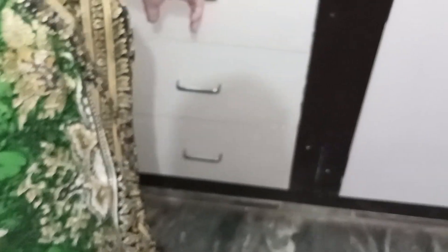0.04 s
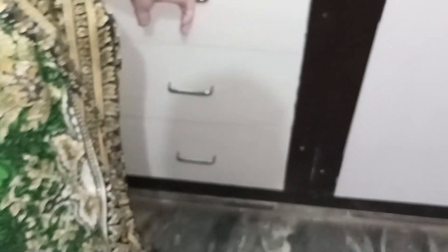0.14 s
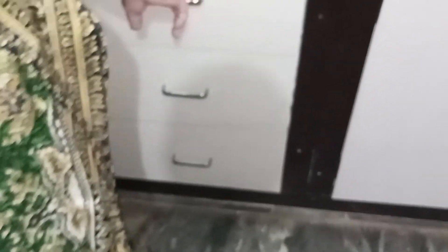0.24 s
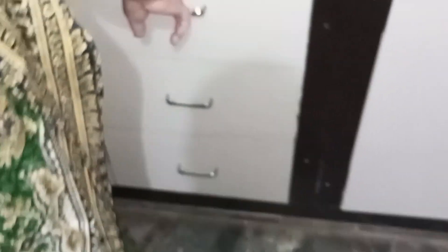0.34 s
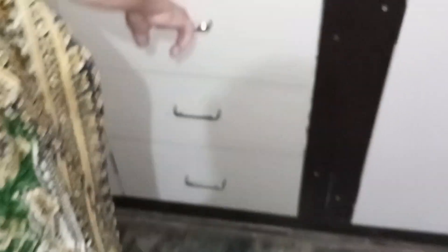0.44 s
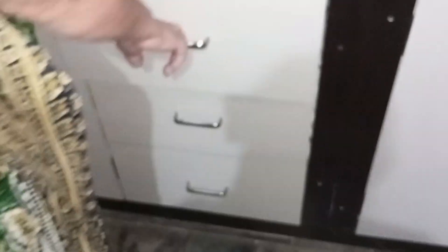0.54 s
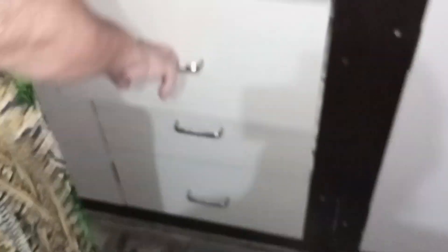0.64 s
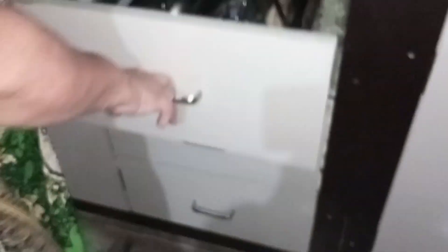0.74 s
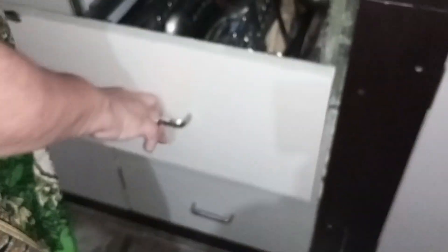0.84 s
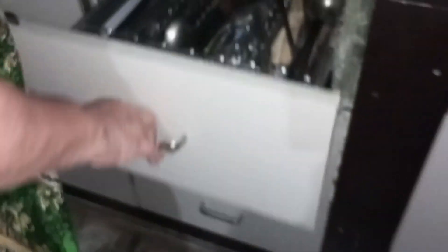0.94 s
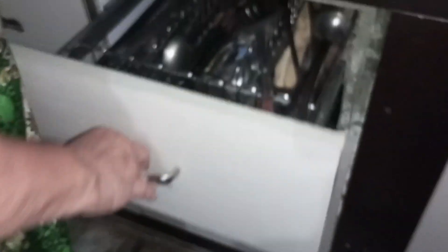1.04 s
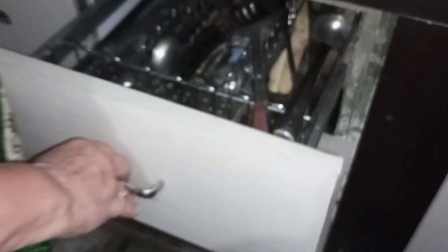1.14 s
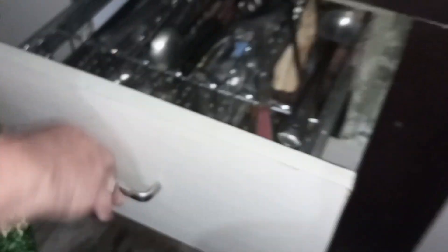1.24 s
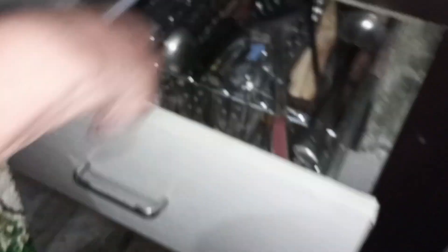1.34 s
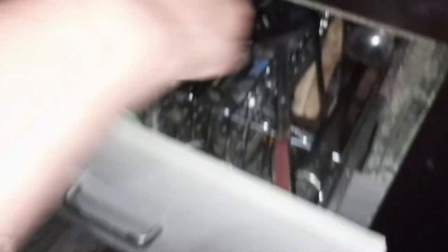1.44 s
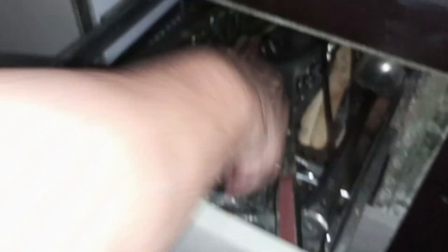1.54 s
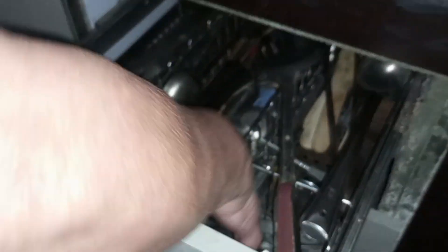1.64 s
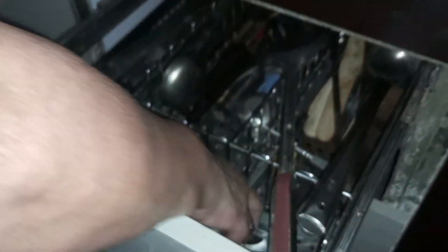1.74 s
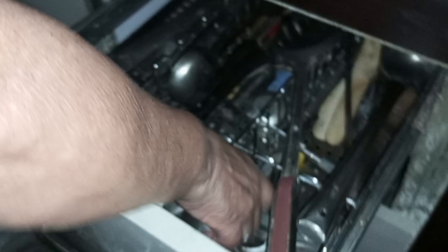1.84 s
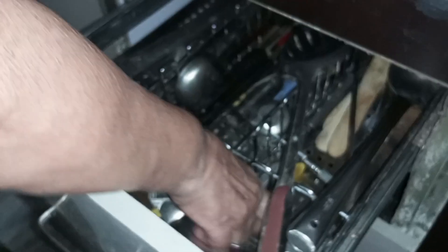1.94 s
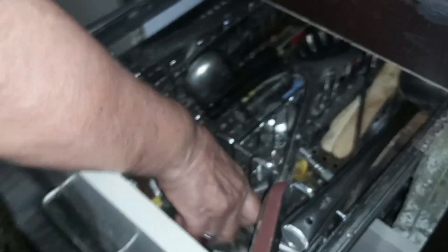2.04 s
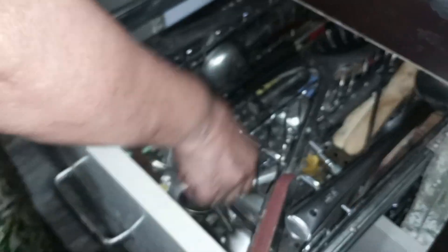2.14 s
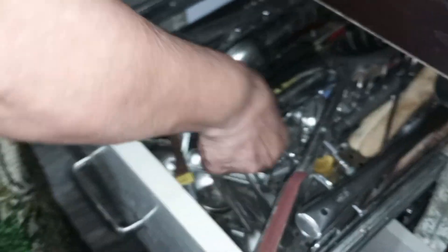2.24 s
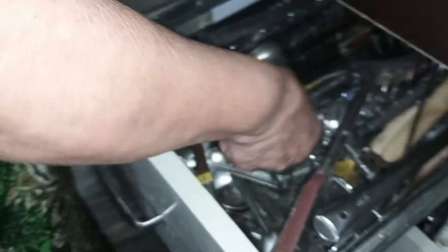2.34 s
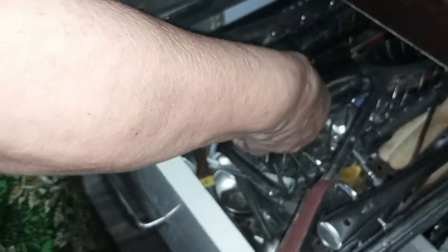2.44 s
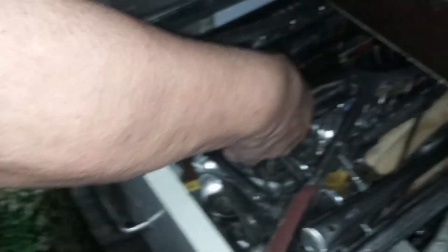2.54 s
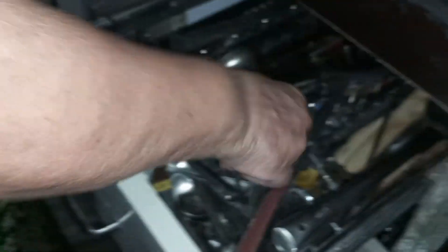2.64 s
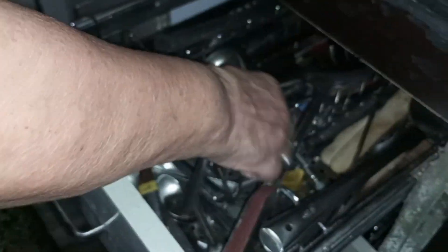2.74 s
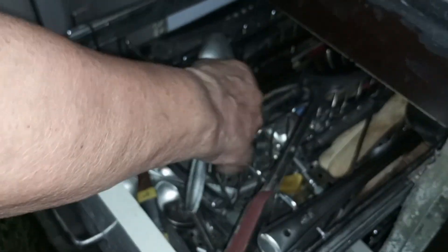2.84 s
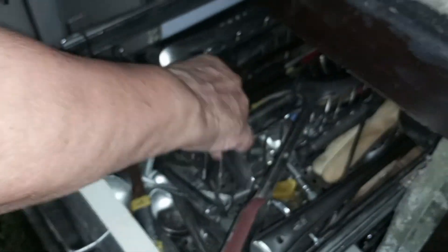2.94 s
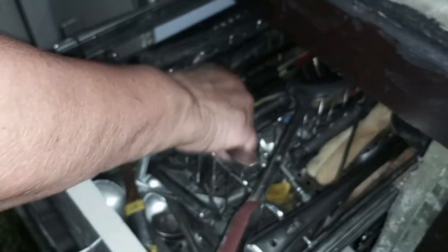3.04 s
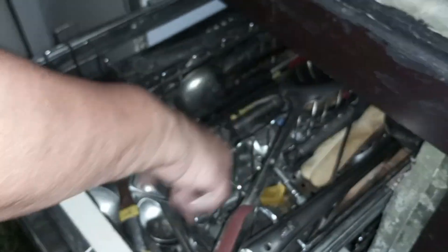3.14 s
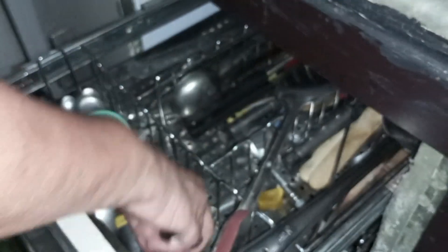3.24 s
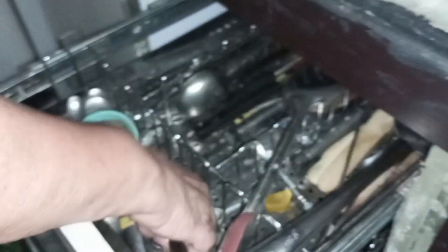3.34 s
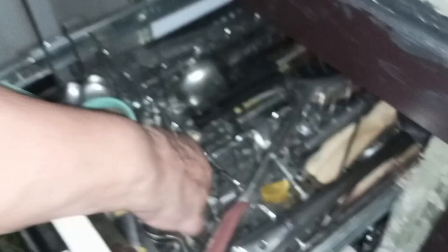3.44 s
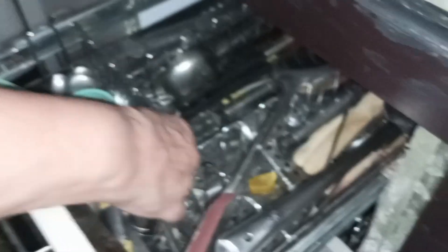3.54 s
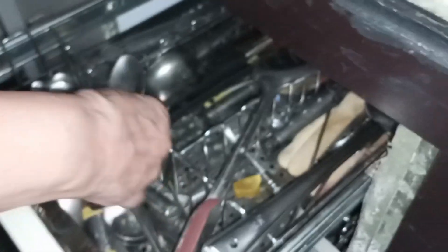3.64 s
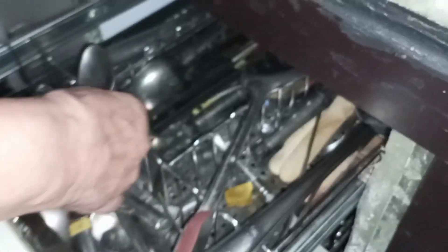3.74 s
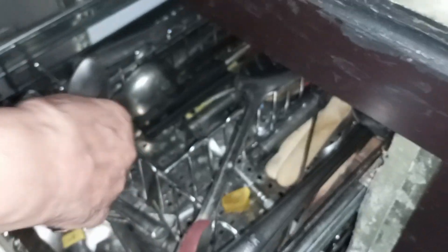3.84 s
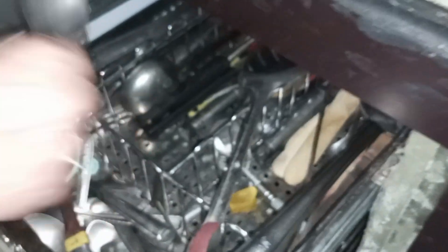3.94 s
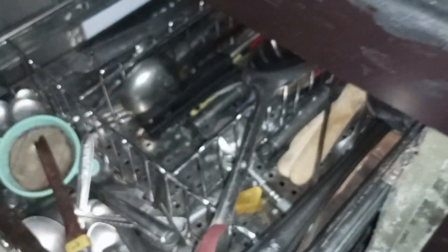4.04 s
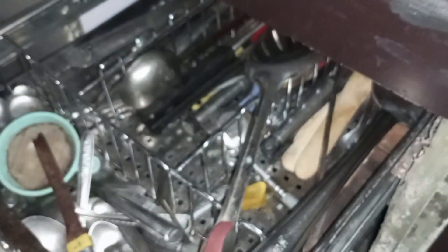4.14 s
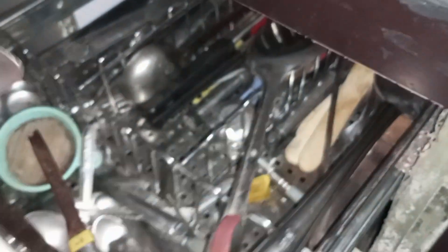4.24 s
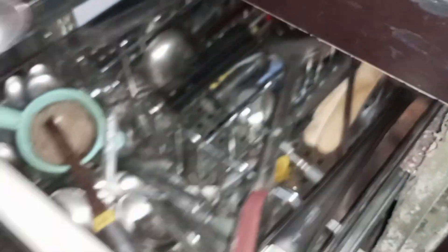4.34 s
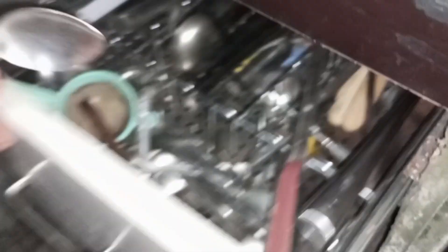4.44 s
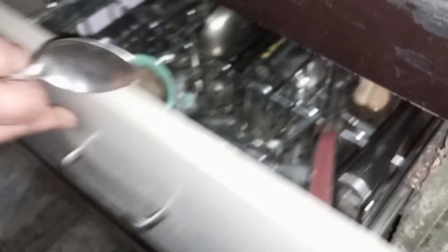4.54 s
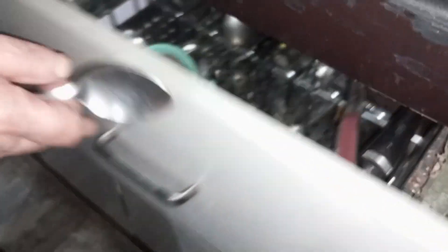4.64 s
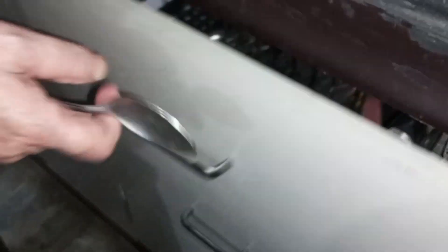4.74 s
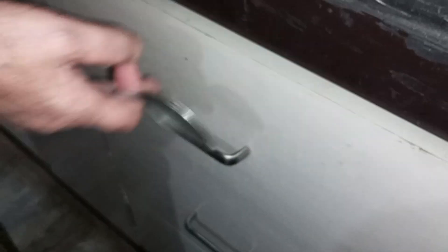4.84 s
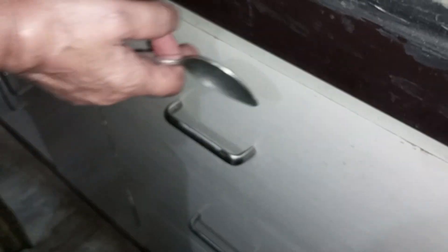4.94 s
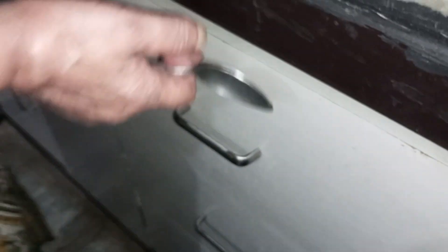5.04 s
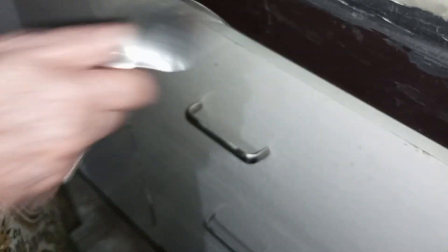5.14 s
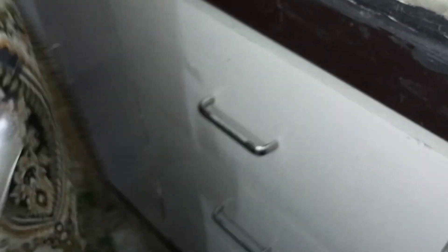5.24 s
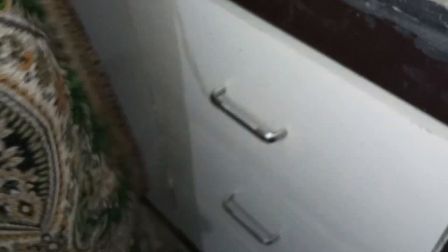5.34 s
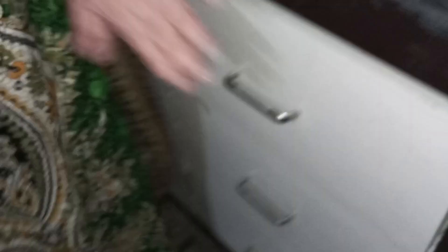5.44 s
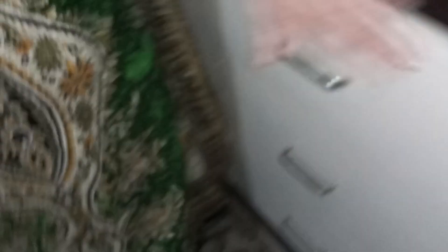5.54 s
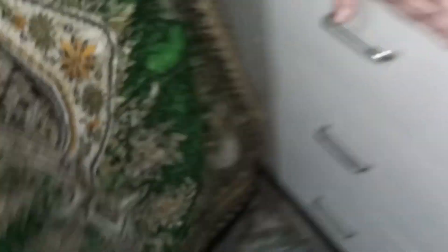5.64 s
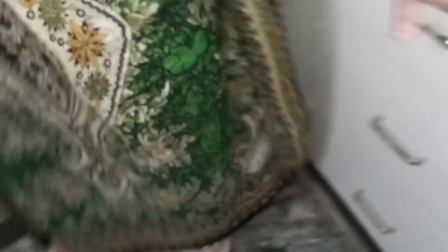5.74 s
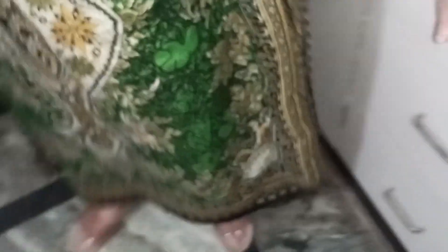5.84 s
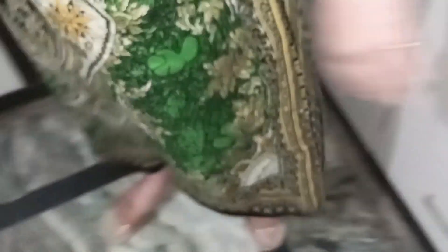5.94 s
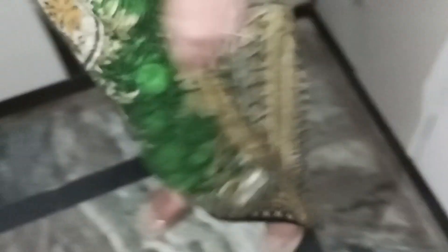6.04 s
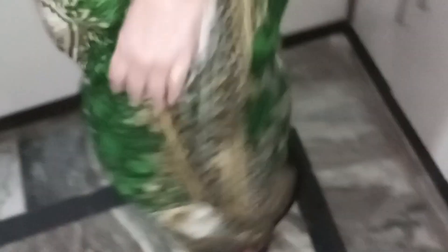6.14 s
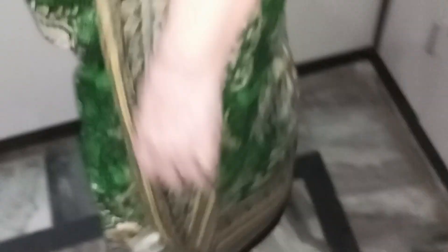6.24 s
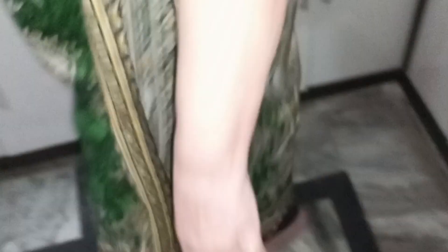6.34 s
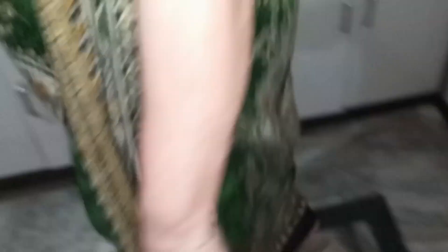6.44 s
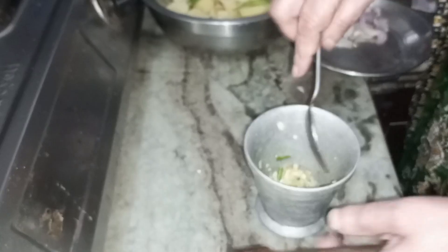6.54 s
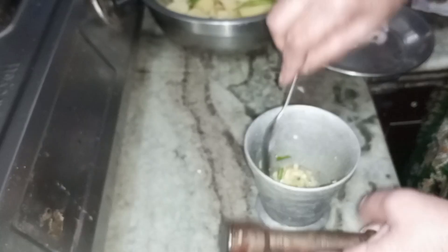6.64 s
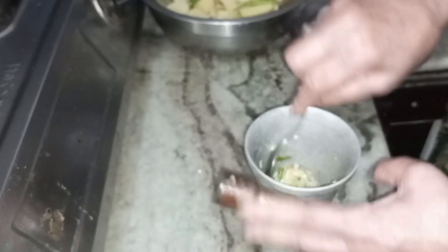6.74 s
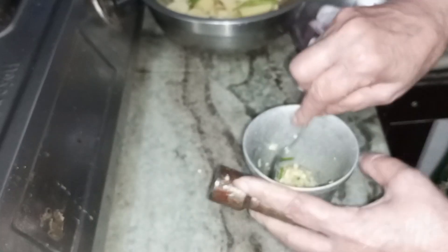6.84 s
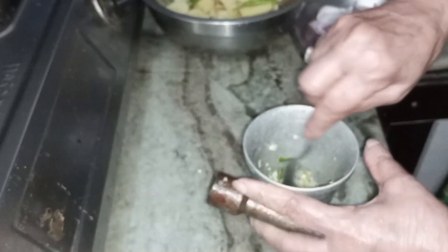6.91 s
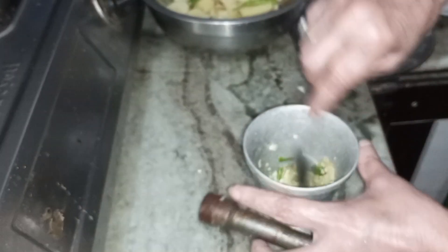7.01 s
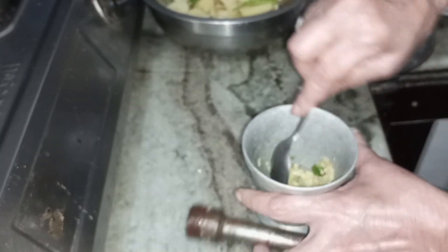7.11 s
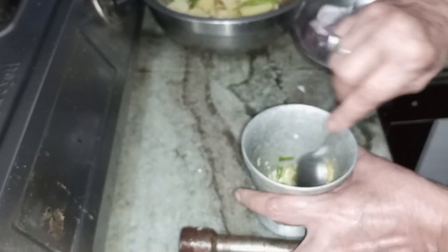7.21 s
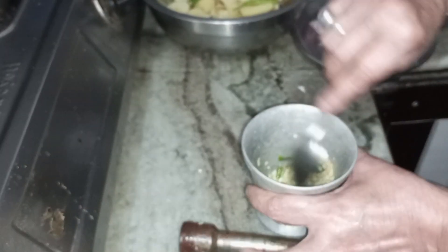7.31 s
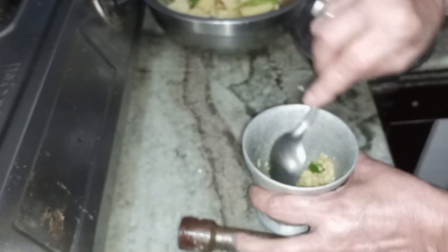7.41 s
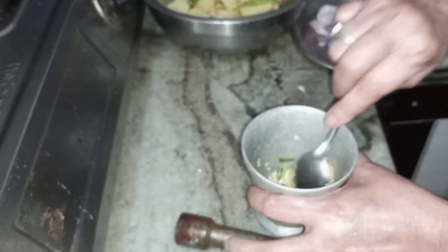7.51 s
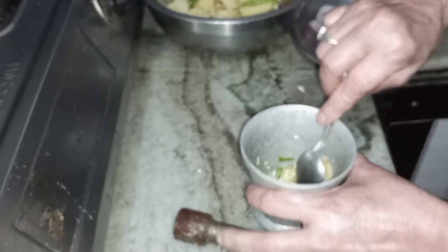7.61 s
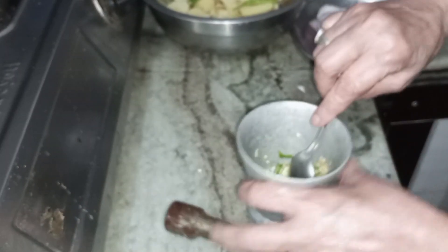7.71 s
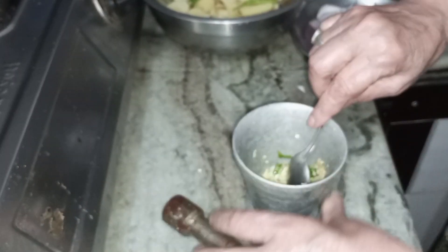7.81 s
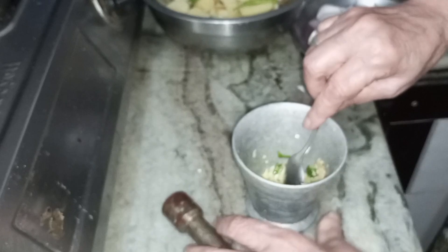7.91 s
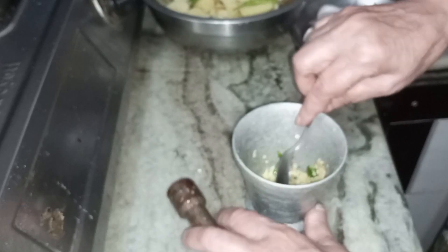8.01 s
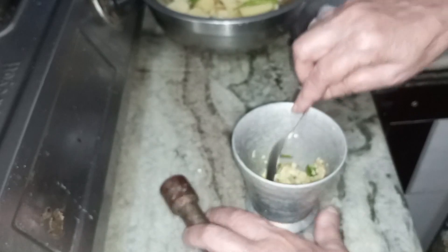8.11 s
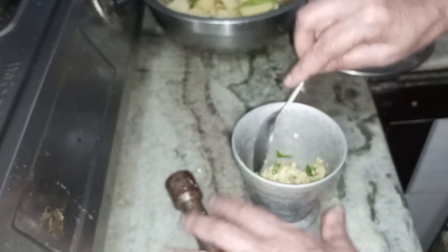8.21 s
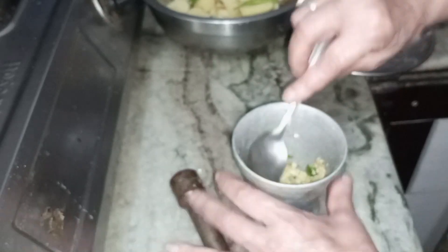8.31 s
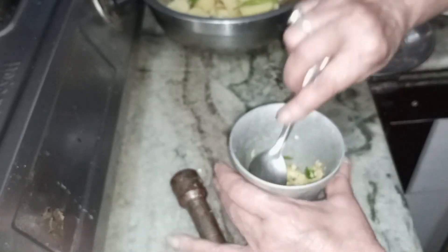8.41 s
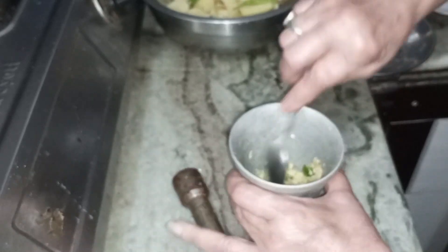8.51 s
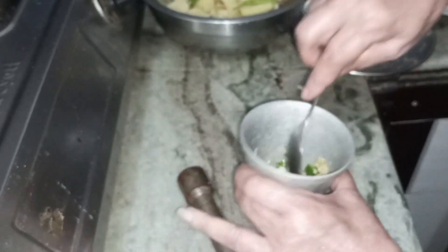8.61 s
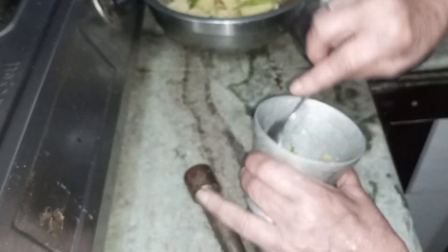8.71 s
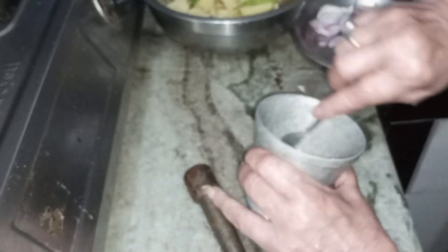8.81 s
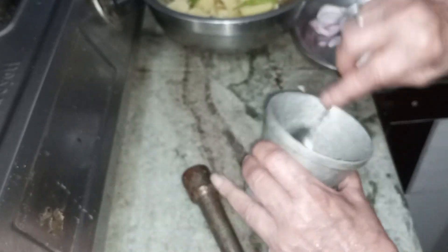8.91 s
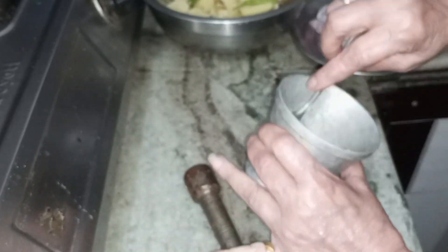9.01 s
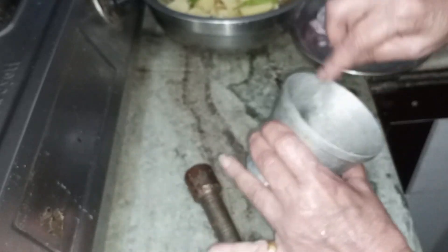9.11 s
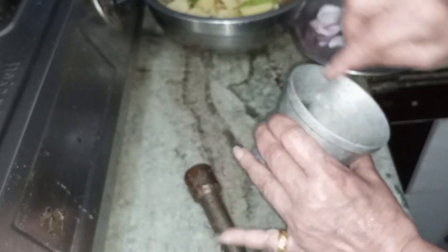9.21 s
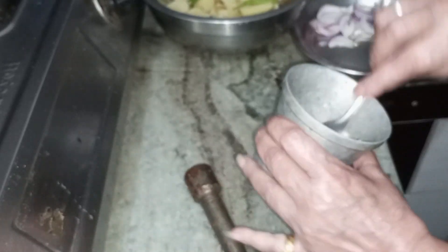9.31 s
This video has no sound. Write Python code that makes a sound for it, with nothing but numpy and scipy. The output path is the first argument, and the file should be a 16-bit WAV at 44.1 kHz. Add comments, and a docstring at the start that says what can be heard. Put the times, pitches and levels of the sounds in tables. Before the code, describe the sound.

Someone rummages through a cutlery drawer and slams it, then clinks and scrapes a spoon in a steel mortar, with faint crickets outside.

```python
"""A kitchen at night, crickets outside. A drawer rolls open, a hand rummages in steel cutlery, and the
drawer slams shut. Then a spoon taps and scrapes a steel mortar on a stone counter, and a steel pestle
is knocked about. Impacts excite free vibration, a sum of damped modes; rolling and rubbing are streams
of tiny contacts that drive resonances in forced vibration. The room adds a short reverberation."""
import sys
import numpy as np
from scipy import signal
from scipy.io import wavfile

SR = 44100
rng = np.random.default_rng(int(sys.argv[2]) if len(sys.argv) > 2 else 0)


def store_wav(level_fs):
    """Save 16-bit WAV to argv[1]."""
    pcm = np.round(np.clip(np.atleast_2d(level_fs), -1, 1) * 32767)
    wavfile.write(sys.argv[1], SR, pcm.T.astype(np.int16))


N = 412996


def gain_of(db):
    """Decibels to amplitude ratio."""
    return 10 ** (np.asarray(db) / 20)


def unit_rms(x):
    """Normalisation to an rms of 1."""
    return x / np.sqrt(np.mean(x ** 2) + 1e-20)


def value_at(points, hz):
    """Interpolation of (Hz, value) points over log frequency."""
    f, value = np.transpose(points)
    return np.interp(np.log(hz + 1), np.log(f + 1), value)


def add(mix, s, sound):
    """Superposition: a sound joins the mix at s seconds."""
    part = mix[round(s * SR):][:len(sound)]
    part += sound[:len(part)]


def coloured(x, spectrum):
    """Minimum-phase filtering, of unit energy, to a spectrum of (Hz, dB) points."""
    db = value_at(spectrum, abs(np.fft.fftfreq(4096, 1 / SR)))
    log_gain = np.log(gain_of(np.maximum(db, -90)))
    taps = np.fft.ifft(np.exp(log_gain - 1j * signal.hilbert(log_gain).imag)).real[:2048]
    return signal.oaconvolve(x, taps / np.linalg.norm(taps))[:len(x)]


def flutter(db, step=500):
    """Random modulation: a gain that glides to a new value every step samples."""
    knots = rng.standard_normal(N // step + 2)
    return gain_of(db * np.interp(np.arange(N) / step, np.arange(len(knots)), knots))


def grit(per_s, spread_db, smooth):
    """Shot noise: tiny contacts of uneven size over a share of smooth noise."""
    size = gain_of(spread_db * np.minimum(rng.exponential(1, N), 5)) * rng.standard_normal(N)
    contacts = size * (rng.random(N) < per_s / SR)
    return unit_rms(unit_rms(contacts) + smooth * rng.standard_normal(N))


def ring(modes, rise=0.00026, free=1):
    """Free vibration: damped sines from (Hz, dB, t60 s) modes; free scales the decay times."""
    hz, db, t60 = np.transpose(modes)[:, :, None]
    t60 = np.clip(t60 * free, .005, 1)
    t = np.arange(round(t60.max() * SR)) / SR
    sines = gain_of(db - 60 * t / t60) * np.sin(2 * np.pi * hz * t)
    return sines.sum(0) * (1 - np.exp(-t / max(rise, 1e-4)))


def resonator(x, hz, width):
    """Resonance: one driven mode of peak gain 1 and a bandwidth in Hz."""
    r = np.exp(-np.pi * width / SR)
    return 2 * signal.lfilter([1 - r], [1, -r * np.exp(2j * np.pi * hz / SR)], x).real


def driven(x, modes):
    """Forced vibration of a body with (Hz, bandwidth Hz, dB) modes."""
    return sum(gain_of(db) * resonator(x, hz, width) for hz, width, db in modes)


def burst(db, t60, rise):
    """Envelope of an impact: fast rise, exponential decay."""
    t = np.arange(SR // 5) / SR
    return gain_of(db - 60 * t / max(t60, .005)) * (1 - np.exp(-t / max(rise, 1e-4)))


def gestures(rows, rise_db=20):
    """Exponential swell and decay: an envelope per dB column of (peak s, rise s, hold s, t60 s, dB..)."""
    tracks = np.zeros((len(rows[0]) - 4, N))
    for s, rise, hold, t60, *levels in rows:
        rise, t60 = np.clip(rise, .001, .4), np.clip(t60, .02, 1)
        t = np.arange(-min(2 * rise, s), hold + t60, 1 / SR)
        shape = gain_of(np.minimum(rise_db * t / rise, 0) - 60 * np.maximum(t - hold, 0) / t60)
        for track, db in zip(tracks, levels):
            add(track, s + t[0], gain_of(db) * shape)
    return tracks


def night():
    """Stridulation: three near crickets pulse wavering tones over a far chorus and room hiss."""
    # Spectra of the hiss and the chorus. Each row: frequency in Hz, relative density in dB.
    air = [(15, -43), (25, -22), (111, -4.5), (197, -10), (226, -6), (313, -15.5), (378, -10.5), (457, -15),
           (4020, -27.5), (4730, -29), (5420, -27), (8100, -30), (9100, -21), (10000, -23.5), (11300, -17),
           (14000, -33), (16500, -47)]
    far_crickets = [(4200, -60), (4450, -22), (4600, -3), (4700, 0), (4810, -1), (4900, -20), (5200, -60)]
    strokes_per_s, waver = 50, .011  # waver is a share of the pitch
    chorus = unit_rms(coloured(rng.standard_normal(N), far_crickets) * flutter(2.5))
    phrases = flutter(4, step=SR // 10)
    for hz in (4610, 4700, 4790):
        pitch = hz * flutter(1, step=SR // 7) ** (8.7 * waver)
        rate = strokes_per_s * flutter(.3, step=SR // 5)
        strokes = np.maximum(np.sin(2 * np.pi * np.cumsum(rate) / SR) + .6, 0)
        chorus += gain_of(-4) * strokes * phrases * np.sin(2 * np.pi * np.cumsum(pitch) / SR)
    return gain_of(-61.5) * coloured(rng.standard_normal(N), air) + gain_of(-65.5) * unit_rms(chorus)


def drawer():
    """Rolling noise shakes the tray and its load; the front's impact and rebounds ring the panels."""
    # Runs on the rollers. Each row: start and length in seconds; relative rumble, rustle, hiss in dB.
    slides = [(0.515, .58, -54, -67.5, -73), (4.426, 0.36, -50.5, -71, -74)]
    # Cutlery and cloth shift. Each row: peak time, rise, t60 in seconds; the same three levels in dB.
    shifts = [(.214, 0.12, .33, -86, -63.5, -64), (.482, 0.11, 0.24, -73, -60.5, -63),
              (.875, 0.041, 0.13, -65, -66, -72), (1.225, 0.084, 0.36, -64, -61.5, -54),
              (1.433, 0.015, 0.24, -59, -68, -75), (1.64, 0.048, 0.33, -57.5, -67, -71),
              (3.542, 0.004, 0.72, -47, -52, -59), (3.714, 0.017, 0.21, -65.5, -42.5, -65),
              (4.363, 0.025, 0.053, -56, -47, -58), (4.492, 0.075, 0.036, -53, -56, -59),
              (4.636, 0.063, 0.44, -50, -48, -56), (4.853, .02, 0.2, -23, -66, -60),
              (4.89, 0.026, 0.23, -43, -36.5, -39.5), (5.1, 0.5, 0.36, -47, -52, -74),
              (5.294, 0.027, 0.31, -50, -58, -58), (5.638, 0.0037, 0.18, -27, -57, -48),
              (5.62, 0.064, 0.13, -66, -58, -56), (5.657, 0.011, 0.3, -32, -68, -63),
              (5.683, 0.026, 0.19, -39.5, -46, -51), (5.796, 0.077, 0.3, -66, -45.5, -39.5),
              (5.96, 0.13, 0.26, -57, -60, -77.5), (6.113, 0.062, 0.42, -61, -67.5, -63),
              (6.401, 0.068, 0.22, -64, -60, -52), (6.423, 0.02, 0.55, -52.5, -71, -78)]
    # Spectra of these noises. Each row: frequency in Hz, relative density in dB.
    rumble_spectrum = [(24, -66), (40, -39), (96, -1.5), (228, 1), (332, -0.5), (585, 2), (909, -4),
                       (1150, -4), (6000, -24.5), (7800, -38), (13200, -120)]
    rustle_spectrum = [(290, -30), (500, -19), (1050, -2.5), (1890, 1), (2940, -1), (6100, -6), (7710, -16),
                       (11000, -6.5), (15800, -37), (16500, -62)]
    hiss_spectrum = [(3000, -47), (7500, -12.5), (10000, 1), (13000, -13), (16000, -10.5)]
    # Handle and tray knock. Each row: time in seconds, relative level in dB, pitch in Hz, t60 in seconds.
    ticks = [(0.204, -40, 3080, 0.045), (0.429, -40.5, 1000, 0.099), (1.171, -34.5, 1705, 0.07),
             (1.208, -36.5, 1290, 0.078), (1.426, -38.5, 1664, 0.083), (1.62, -47, 2980, 0.04),
             (1.645, -37.5, 1616, 0.04), (3.706, -28, 2180, 0.034), (4.203, -41, 2880, 0.057),
             (4.357, -38, 1906, 0.031), (5.285, -53, 2670, 0.04), (6.373, -43.5, 3880, 0.041)]
    # Modes of loose cutlery and metal tray. Each row: frequency and bandwidth in Hz, relative gain in dB.
    loose_modes = [(1170, 26, -12), (1960, 21, 1.5), (2904, 46, 4.5), (5570, 60, 3), (6090, 79, -2),
                   (12100, 73, -27)]
    tray_modes = [(620, 29, -10), (1140, 18, 2), (1547, 32, 1), (2510, 56, 1), (2900, 50, -6),
                  (3200, 21, -9)]
    # The front meets the frame. Each row: time in seconds, then in relative dB the ring, its boost
    # below 90 Hz, its boost above 300 Hz and the clap.
    slams = [(4.835, -19, -14, 1, -21), (4.852, -19, -3, -3, -26), (4.867, -6, -8, -7, -12.5),
             (4.895, -21, -21, -1, -20.5), (5.634, -20.5, -9.5, 6.5, -21.5), (5.654, -14, 7.5, 7, -17.5),
             (5.668, -19, -9, 3.5, -24)]
    # Panel modes. Each row: frequency in Hz, relative level in dB, t60 in seconds.
    panel_modes = [(68, -8, 0.26), (112, -3, 0.29), (318, -12.5, 0.19), (232.5, -1, 0.076),
                   (373.6, -7.5, 0.17), (500, -29, 0.21), (589, -17, 0.12), (805, -11.5, 0.2),
                   (1020, -15, 0.092), (1600, -24, .15), (2450, -23, 0.084)]
    # Spectrum of the clap. Each row: frequency in Hz, relative density in dB.
    clap_spectrum = [(100, 10), (500, 8.5), (1200, -9.5), (2600, -5), (4000, -31), (16000, -50)]
    slide_rise_s, slide_t60 = 0.22, 0.29
    moves = [(s, slide_rise_s, length, slide_t60, *db) for s, length, *db in slides]
    moves += [(s, rise, 0, t60, *db) for s, rise, t60, *db in shifts]
    rumble_env, rustle_env, hiss_env = gestures(moves)
    rollers = rumble_env * flutter(2.1, step=SR // 40) * grit(2000, 3, 1.1)
    out = coloured(rollers, rumble_spectrum)
    for s, db, hz, t60 in ticks:
        add(rustle_env, s, burst(db - 19, t60, 0.00046))
        add(out, s, ring([(hz, db - 12, t60)]))
    rustle = rustle_env * grit(5000, 0.93, 0.62)
    out += gain_of(7) * coloured(rustle, rustle_spectrum)
    out += hiss_env * coloured(grit(5000, 1.7, 0.62), hiss_spectrum)
    early = slice(0, 7 * SR)
    out[early] += gain_of(10.5) * driven(rustle[early], loose_modes)
    out[early] += gain_of(12) * driven(rollers[early], tray_modes)
    claps = np.zeros(N)
    for s, db, low_db, high_db, clap_db in slams:
        modes = [(hz, db - 8 + mode_db + low_db * (hz < 90) + high_db * (hz > 300), t60)
                 for hz, mode_db, t60 in panel_modes]
        add(out, s, ring(modes, rise=0.0054))
        add(claps, s, burst(clap_db, 0.043, 0.00049))
    return out + coloured(claps * rng.standard_normal(N), clap_spectrum)


def cutlery():
    """Collision cascades: each clash starts a shower of contacts that excite inharmonic steel modes."""
    # Hand sweeps. Each row: start, rise, length, t60 in seconds; relative level in dB.
    sweeps = [(1.729, 0.0033, 0.16, 0.029, -30.5), (1.9, .02, 0.051, 0.22, -41.5),
              (2.022, 0.013, .001, 0.2, -29.5), (2.13, 0.028, 0.13, 0.52, -25.5),
              (2.214, 0.069, .14, 0.088, -27), (2.448, 0.07, 0.082, 0.27, -24.5),
              (3.42, 0.02, 0.012, 0.27, -42), (3.55, 0.012, 0.023, .35, -57)]
    # Each row: time in seconds, relative level in dB, main ring in Hz, t60 of the shower in seconds.
    clashes = [(1.7288, -14.5, 5730, 0.069), (1.7871, -15.5, 10700, 0.2), (1.823, -10, 11000, 0.021),
               (1.852, -17, 9680, 0.086), (1.8758, -11.5, 10900, 0.05), (1.921, -23.5, 10300, 0.14),
               (1.9418, -25, 13400, .06), (2.02, -25.5, 11100, 0.02), (2.034, -20.5, 11200, 0.041),
               (2.1009, -29, 11200, 0.062), (2.1144, -25, 9800, 0.025), (2.123, -15, 10450, 0.016),
               (2.1438, -17, 10800, 0.075), (2.1949, -4, 10900, 0.014), (2.244, -6, 10660, 0.021),
               (2.318, -7, 10670, 0.014), (2.3488, -10.5, 4570, 0.02), (2.413, -20, 9940, 0.1),
               (2.427, -17.5, 8900, .1), (2.45, -9.5, 10970, 0.059), (2.519, -9, 10460, 0.05),
               (2.6785, -3, 6100, 0.16), (2.6847, -12, 10100, .03), (3.383, -15, 10600, 0.27),
               (3.5374, -19, 10960, 0.13)]
    # Modes of single pieces. Each row: frequency in Hz, relative level in dB, t60 in seconds.
    knife = [(4576, 0, .075), (7250, -5, .06)]
    ladle = [(3553, -14, .13), (3985, -14, .11), (5163, -3, .08), (5750, -1, .09), (7133, -16.5, .26),
             (9932, -11, .2), (10260, 0, .08), (11710, -7, .08), (12540, -5, .09), (13100, -9, .15),
             (13740, -13, .12)]
    server = [(4576, -17, .18), (4786, -16, .18), (6239, -6, .2), (7757, -14, .15), (9440, -4, .09),
              (9652, -10, .2), (10490, -9, .25), (10880, -7, .26), (11970, -1, .09), (12500, -6, .08),
              (13790, -13, .12), (15140, -20, .17)]
    tongs = [(5383, -1.5, 0.13), (9055, -9, 0.18), (9270, -11, 0.23), (9448, -4, 0.15), (10870, -1, 0.27),
             (11890, -7, 0.16), (15080, -2, 0.21)]
    fork = [(2850, 6.5, 0.08), (2970, 6, .07), (2300, 4, .08), (5630, -1, 0.15), (5740, -1, .15)]
    basket = [(405, -4, 1), (418, -3.5, 1)]
    teaspoon = [(6200, 0, .25), (6520, -2, .2)]
    # Each row: a piece, then its clinks as time in seconds and level in dB.
    clinks = [(teaspoon, (.92, -67), (1.02, -62)), (knife, (2.3495, -17)), (ladle, (2.6787, -19)),
              (server, (3.384, -21), (3.398, -24)), (tongs, (3.538, -39.5)),
              (fork, (4.87, -44), (4.96, -48), (5.005, -51), (5.029, -45), (5.08, -50)),
              (basket, (4.87, -39), (5.29, -55), (5.661, -43.5))]
    # Pieces ringing under the hand. Each row: frequency and bandwidth in Hz, relative gain in dB.
    heap_modes = [(8800, 40, 0), (9600, 40, -2), (9780, 40, 0), (10500, 45, 0), (10930, 45, 3),
                  (11760, 50, 0)]
    # Spectrum of steel contacts. Each row: frequency in Hz, relative density in dB.
    steel_spectrum = [(59, -76), (100, -43), (225, -13), (338, -21), (577, -9), (642, -20), (699, -10),
                      (1170, -11), (1950, -5), (2360, -7.5), (6050, -6.5), (7810, -11.5), (10800, -2.5),
                      (15500, -16.5), (16500, -40)]
    force, out = gestures(sweeps)[0] * gain_of(-5.5), np.zeros(N)
    for (s, db, hz, t60), draws in zip(clashes, rng.random((len(clashes), 6, 3))):
        add(force, s, burst(db - 15, 0.007, 0.00023))  # first contact
        add(force, s, burst(db - 17.5, t60, 0.00081))  # shower
        add(out, s, ring([(hz, db - 14.5, .05), (hz * 1.012, db - 16.5, .04)], rise=0.00055))
        neighbour_modes = draws * [5000, 8, .06] + [8600, db - 24, .025]
        add(out, s, ring(neighbour_modes, rise=.001))
    for piece, *strikes in clinks:
        for s, db in strikes:
            modes = [(hz, db + mode_db, min(t60, .9)) for hz, mode_db, t60 in piece]
            add(out, s, ring(modes, rise=0.00019))
    contacts = grit(8000, 2, .7) * force
    busy = slice(round(1.7 * SR), 4 * SR)
    force = force[busy]
    out[busy] += gain_of(11) * driven(force * grit(900, 2, .4)[busy], heap_modes)
    for draws in rng.random((24, 5, 3)):  # 24 pieces of five modes, each struck about 18 times a second
        modes = draws * [10000, 12, .06] + [5200, -12, .03]
        blows = gain_of(1.2 * rng.exponential(1, len(force))) * (rng.random(len(force)) < 18 / SR)
        contacts[busy] += gain_of(-7) * signal.oaconvolve(blows * force, ring(modes))[:len(force)]
    chatter = flutter(4.8, step=SR // 130)  # pieces touch as they ring
    return coloured(contacts, steel_spectrum) + out * chatter


def mortar():
    """Impact and friction: taps ring cup and spoon, scraping drives both, the foot grinds on stone."""
    # Spoon on mortar. Each row: time in seconds, then in relative dB the crack, the cup's low, middle # and top
    # ring, and the spoon's low, hollow-sounding ring.
    taps = [(7.1214, -8.5, -21, -15.5, -45, -48), (7.2023, -34, -40, -39, -60, -36),
            (7.5149, -20.5, -45, -50, -68, -52), (8.2923, -13, -30, -21.5, -29, -39),
            (8.3825, -31, -38.5, -38, -70, -29), (8.5489, -25.5, -60, -36, -53, -25.5),
            (8.8412, -28, -47, -37, -53, -52), (8.8646, -9.5, -57, -53, -55, -12.5),
            (8.9304, -35, -52, -47, -71, -20), (9.0936, -11.5, -40, -28, -51, -9.5),
            (9.1527, -28.5, -56, -50, -64, -22.5), (9.2308, -16.5, -31.5, -33.5, -55, -50),
            (9.3342, -24, -50, -48, -42, -46), (9.3499, -10, -32, -51, -39, -15.5)]
    swipes = [(6.529, -34, -45, -29.5, -55, -22.5), (6.88, -40, -60, -40, -53, -60),
              (6.985, -28, -60, -40, -60, -50), (7.047, -32, -52, -47, -79.5, -47),
              (7.2638, -19, -34, -53, -44, -53), (7.286, -17, -30, -33, -58, -48),
              (7.3335, -28, -52, -53, -68, -51), (7.556, -22, -50, -42, -54, -56),
              (7.5852, -28.5, -48, -33, -44.5, -39), (8.535, -21, -56.5, -51, -57, -41),
              (8.6047, -18, -29, -27, -65, -39), (8.737, -18, -17, -29, -72, -40),
              (9.036, -20, -21, -25, -74, -50), (9.3217, -19.5, -41, -36, -39, -39)]
    # Cup modes: frequencies in Hz, and for each a row of relative level in dB and t60 in seconds.
    cup_hz = [1809, 1800, 1770, 4180, 4190, 4140, 7553, 11755, 15080]
    cup_modes = [(3, 0.08), (-22, 0.71), (-6.5, 0.083), (-0.5, 0.11), (-48, 0.37), (-38, 0.24), (0, 0.12),
                 (2, 0.14), (3, 0.083)]
    # Modes of the spoon: its higher ring, then its low, hollow-sounding ring. Each row: frequency in Hz, #
    # relative level in dB, t60 in seconds.
    spoon_modes = [(2640, -44, 0.032), (3330, -24, 0.074), (6290, -16, 0.018), (8980, -22, 0.038),
                   (9140, -16.5, 0.035), (9340, -27, 0.036), (10870, -16, 0.032)]
    hollow_modes = [(1003, -14, 0.058), (1106, -11.5, 0.033), (1590, -17, 0.011), (2714, -14.5, 0.027)]
    # Each row: peak time, rise, t60 in seconds; foot grind, wall scrape, tip drag in relative dB.
    rubs = [(6.614, 0.07, 0.24, -60, -47, -70), (6.844, 0.053, 0.057, -78, -53, -79),
            (6.863, 0.0015, 0.11, -27, -59, -23.5), (6.95, 0.086, 0.28, -51, -49.5, -45),
            (7.04, 0.091, 0.17, -43, -61, -46), (7.124, 0.0016, 0.1, -46, -32, -36),
            (7.34, .18, 0.2, -48, -43, -56), (7.609, .07, 0.06, -50, -38, -55),
            (7.622, 0.0035, 0.6, -27.5, -62, -28), (7.68, 0.039, 0.48, -30.5, -72, -55),
            (8.01, 0.05, 0.044, -50, -73, -80), (8.043, 0.00079, 0.3, -25.5, -84, -64),
            (8.229, 0.0074, 0.49, -28.5, -37, -33.5), (8.296, .003, 0.4, -47, -31.5, -56),
            (8.608, 0.073, 0.25, -39, -38.5, -33.5), (8.738, 0.0084, 0.4, -49, -48, -49.5),
            (8.865, 0.01, 0.15, -34, -37, -41), (8.936, 0.058, 0.22, -34.5, -50, -25),
            (9.086, 0.07, 0.83, -51.5, -46, -44), (9.36, 0.059, 0.086, -61, -37, -44)]
    # Spectra of the contacts. Each row: frequency in Hz, relative density in dB.
    crack_spectrum = [(120, -59), (200, -24.5), (1830, 8), (2460, -3.5), (3130, 11), (3700, 2.5),
                      (4210, -0.5), (5060, -5.5), (7460, -3.5), (11600, 0.5), (16500, -38)]
    foot_spectrum = [(200, -18), (1500, 0.5), (4500, -5), (8000, -14), (14000, -33)]
    scrape_spectrum = [(290, -41), (500, -17), (1810, -6.5), (2040, -3.5), (3550, -10.5), (4110, -8),
                       (4620, -8.5), (7940, -12.5), (8800, -11), (11000, 3.5), (12900, -47), (15600, -30),
                       (16500, -29)]
    stone_spectrum = [(24, -37), (40, -15.5), (308, 1.5), (434, -1.5), (510, 5), (828, -4), (1710, 0),
                      (2730, -13), (3140, -23), (5000, -37), (6500, -57), (11000, -120)]
    detune, hollow_width = .003, .15  # shares of the pitch
    contact_s, set_down_s = .022, 6.863
    out, cracks = np.zeros(N), np.zeros(N)
    for strokes, rise, crack_t60, free, drop_db in ((taps, .0003, .014, .95, 0),
                                                    (swipes, .012, .05, 1.2, 9)):
        for s, crack_db, low_db, mid_db, top_db, hollow_db in strokes:
            add(cracks, s, burst(crack_db - 3, crack_t60, rise))
            balance = [(1800, low_db), (4170, mid_db), (15000, top_db)]
            grip = 1 + detune * rng.uniform(-1, 1, len(cup_modes))  # the grip shifts each mode
            modes = [(hz * shift, db + value_at(balance, hz), t60)
                     for hz, shift, (db, t60) in zip(cup_hz, grip, cup_modes)]
            modes += [(hz, db + hollow_db, t60) for hz, db, t60 in hollow_modes]
            modes += [(hz, db + crack_db, t60) for hz, db, t60 in spoon_modes]
            sound = ring(modes, rise, free)
            lifted = np.clip((np.arange(len(sound)) / SR - contact_s) / .008, 0, 1)
            add(out, s, sound * gain_of(-drop_db * lifted))  # a swipe drops as the spoon leaves
    out *= flutter(3.5, step=SR // 260)  # the holding hand damps the cup unevenly
    foot, wall, tip = gestures([(s, rise, 0, t60, *db) for s, rise, t60, *db in rubs])
    add(foot, set_down_s, burst(-22, 0.028, 0.00031))  # the foot thuds on the stone
    foot_crack = burst(-22, 0.054, 0.00018) * rng.standard_normal(SR // 5)
    add(out, set_down_s, coloured(foot_crack, foot_spectrum))
    scrape, drag = wall * grit(4000, 3, 0.66), tip * grit(1500, 1.9, 0.49)
    out += gain_of(-3) * coloured(scrape, scrape_spectrum)
    out += coloured(cracks * rng.standard_normal(N), crack_spectrum)
    out += foot * coloured(grit(2500, 2.1, 0.97), stone_spectrum)
    late = slice(6 * SR, N)
    hum_hz = cup_hz[::3] + [mode[0] for mode in spoon_modes]
    out[late] += driven(scrape[late], [(hz, 140, 10 + value_at(scrape_spectrum, hz)) for hz in hum_hz])
    for hz, db, _ in hollow_modes:  # two passes steepen the skirts
        width = hollow_width * hz
        out[late] += gain_of(db + 25) * resonator(resonator(drag[late], hz, width), hz, width)
    return out


def pestle():
    """Bending vibration of a bar: the striking point sets the balance of its closely grouped modes."""
    # Bar modes: frequencies in Hz, and for each a row of relative level in dB and t60 in seconds.
    bar_hz = [3114, 3108, 3089, 5910, 5872, 5958, 9667, 9630, 13830]
    bar_modes = [(3.5, 0.3), (-10.5, 0.6), (-14, 0.24), (9.5, 0.34), (-3, 0.4), (-6, 0.2), (6, 0.28),
                 (-4, 0.25), (-12, 0.16)]
    # Each row: time in seconds; low, middle, top level in dB; rise in seconds; share of free ring time.
    knocks = [(6.864, -40, -55, -61, .002, 0.8), (7.6187, -19, -30, -35, 0.0076, 0.57),
              (7.6758, -25.5, -37, -47, 0.0025, 0.55), (8.0416, -35.5, -45.5, -60, 0.0074, 0.62),
              (8.2237, -22, -22, -21, 0.005, 0.29), (8.2395, -20, -25.5, -23, 0.002, 0.96),
              (8.293, -31, -29, -40, 0.0032, 1)]
    # Bumps on the counter. Each row: time in seconds, level in dB, pitch in Hz, t60 in seconds.
    thumps = [(6.733, -19.5, 68, 0.012), (7.026, -35, 579, 0.074), (7.326, -36.5, 524, 0.071),
              (7.949, -36.5, 524, 0.3), (7.98, -26, 130, 0.044), (8.003, -23, 79.5, 0.027),
              (8.186, -32.5, 512, 0.23), (8.239, -29.5, 530, 0.13), (8.384, -19, 538, 0.022)]
    bar, counter = np.zeros(N), np.zeros(N)
    for s, low_db, mid_db, top_db, rise, free in knocks:
        balance = [(3100, low_db), (5900, mid_db), (9660, top_db)]
        modes = [(hz, db + value_at(balance, hz), t60) for hz, (db, t60) in zip(bar_hz, bar_modes)]
        add(bar, s, ring(modes, rise, free))
    for s, db, hz, t60 in thumps:
        add(counter, s, ring([(hz, db, t60)], rise=0.0017))
    return counter + bar * flutter(2.5, step=SR // 200)  # the bar rocks on the stone


def kitchen(x):
    """Reverberation: sparse reflections of random sign, each band decaying at its own rate."""
    # Each row: frequency in Hz, reverberation time in seconds.
    decay_times = [(100, 0.61), (500, 0.37), (2000, 0.46), (6000, 0.28), (14000, 0.046)]
    echoes = np.zeros(SR // 2)
    slots = np.arange(200, len(echoes) - 20, 20)
    echoes[slots + rng.integers(0, 20, len(slots))] = rng.choice([-1., 1.], len(slots))
    hz, t, bands = signal.stft(echoes, SR, nperseg=256)
    decay = gain_of(-60 * t / value_at(decay_times, hz)[:, None])
    tail = signal.istft(bands * decay, SR, nperseg=256)[1]
    return signal.fftconvolve(x, tail / np.linalg.norm(tail))[:N]


def scene():
    """Superposition of direct sound, reverberation and night air; the level dips before the mortar."""
    direct = drawer() + cutlery() + mortar() + pestle()
    mix = direct + gain_of(-13) * kitchen(direct) + night()
    t = np.arange(N) / SR
    dip_start_s, dip_end_s = 6.515, 6.527
    dip = np.clip(np.maximum(dip_start_s - t, t - dip_end_s) / 0.00056, .03, 1)
    return (mix * dip)[None]


def record(dry):
    """Band limiting: the microphone loses the deepest bass, and a low-pass cuts the top treble."""
    highpass = signal.butter(2, 40., "high", fs=SR, output="sos")
    lowpass = signal.firwin(511, 15900, window=("kaiser", 9), fs=SR)
    return signal.oaconvolve(signal.sosfilt(highpass, dry), lowpass[None], "same")


dry = scene()
out = record(dry)
store_wav(out)
```